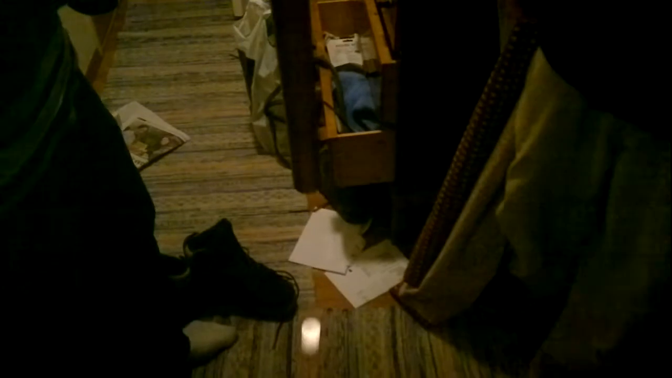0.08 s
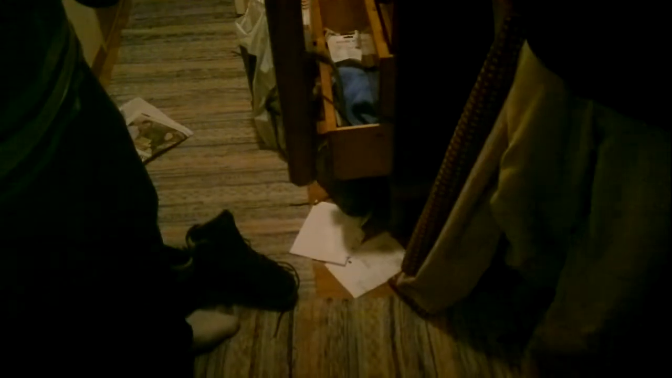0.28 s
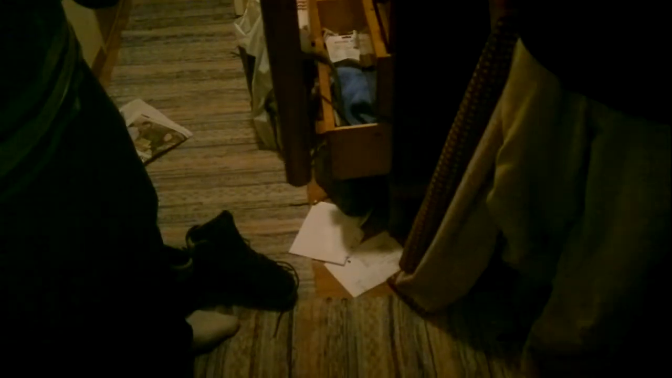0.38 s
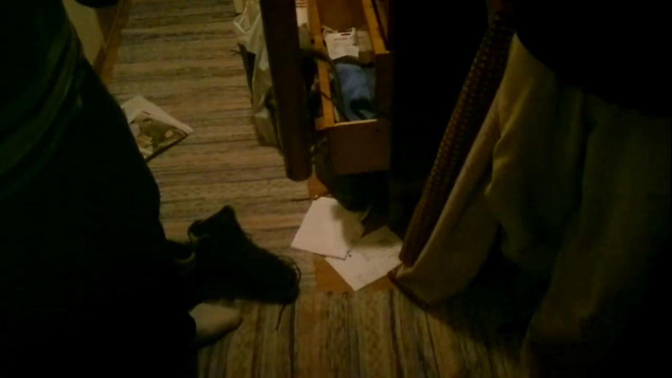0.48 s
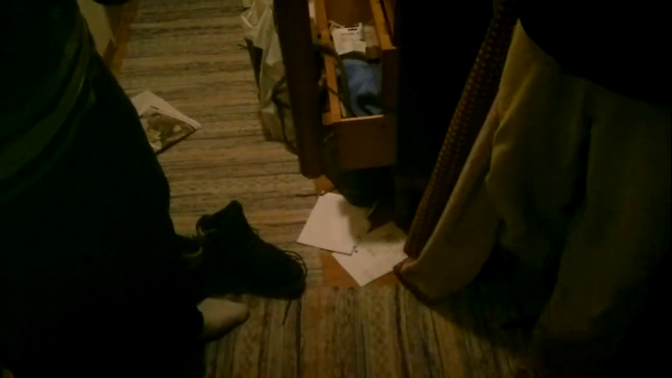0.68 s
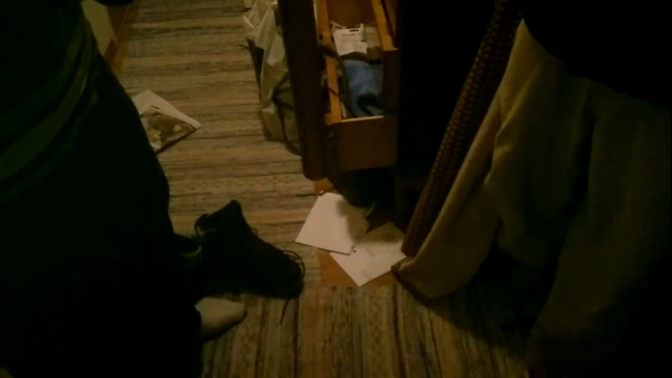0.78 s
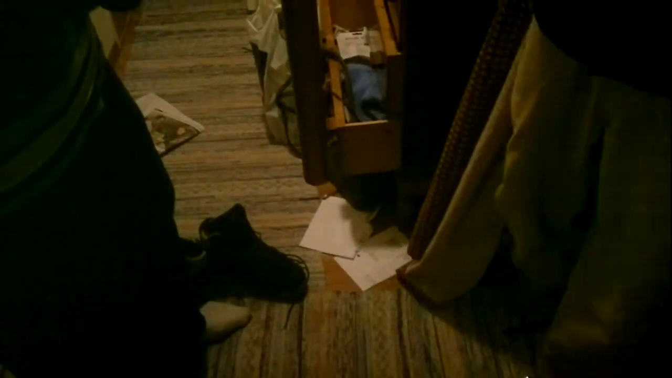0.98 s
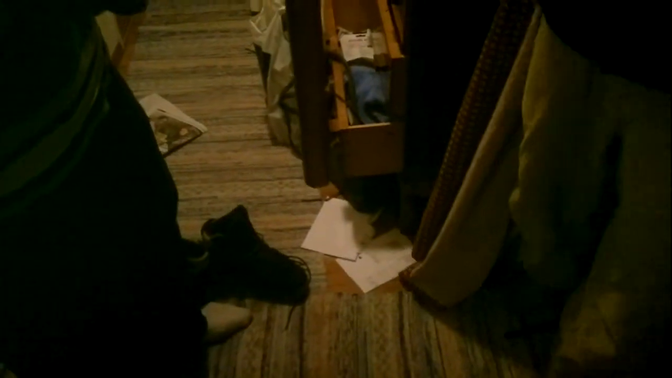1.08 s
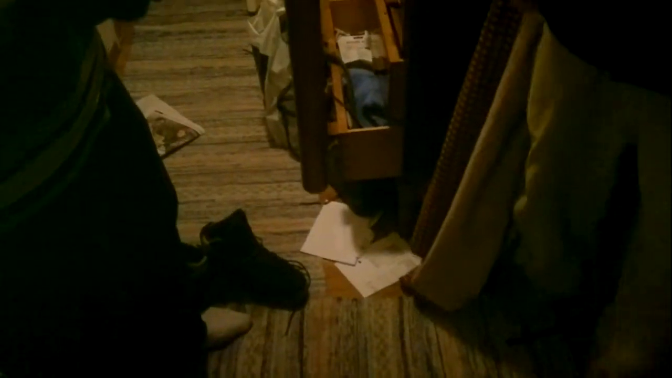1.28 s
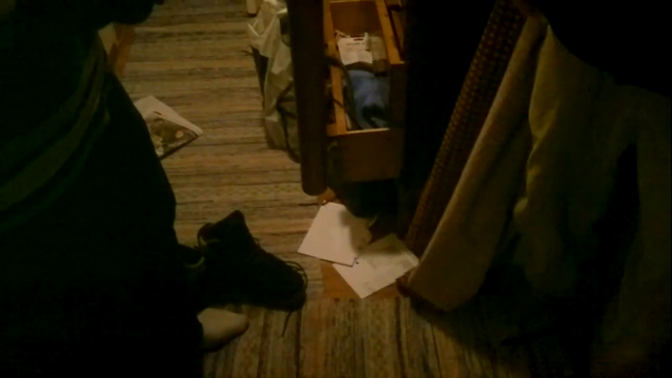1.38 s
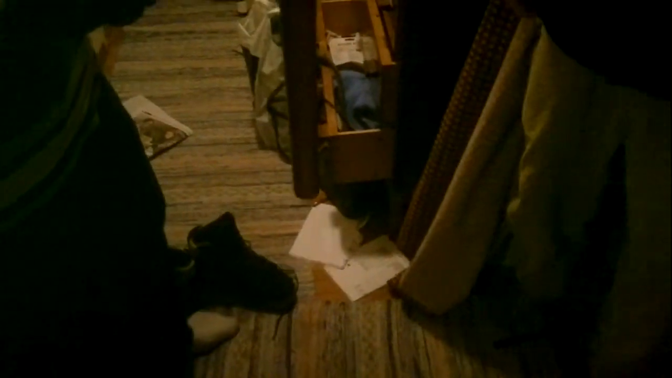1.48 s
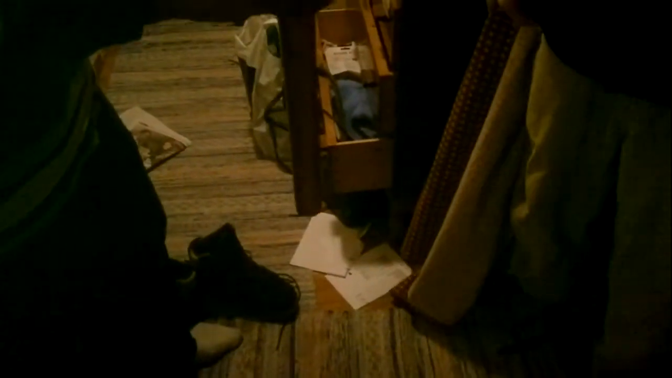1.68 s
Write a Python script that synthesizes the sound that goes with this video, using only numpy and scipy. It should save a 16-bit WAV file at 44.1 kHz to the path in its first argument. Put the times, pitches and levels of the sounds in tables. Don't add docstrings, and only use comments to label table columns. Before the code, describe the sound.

Hard knock of a small heavy magnet landing on floorboards, two duller bounces, then foot scuffs

```python
import sys
import numpy as np
from scipy import signal
from scipy.io import wavfile

SR = 44100
rng = np.random.default_rng(int(sys.argv[2]) if len(sys.argv) > 2 else 0)


def elevation(decibels):
    levels = np.asarray(decibels, float)
    return 10 ** (levels / 20)


def output_pcm(signal):
    pcm = np.clip(np.atleast_2d(signal).T, -1, 1) * 32767
    wavfile.write(sys.argv[1], SR, np.round(pcm).astype(np.int16))


N = 74970

SIDES = np.array([[1.], [-1.]])

# (frequency [Hz], density [dB/Hz])
TONE = [(22, -5), (42, -2), (110, -14.5), (300, -17.5), (800, -22), (1500, -32), (4000, -39), (16000, -56)]
TONE_DB = -58
# (frequency [Hz], correlation [-1..1])
TONE_LIKENESS = [(60, 0.81), (240, 0.74), (950, 0.71), (3770, -0.61), (15000, -0.03)]
# (time [s], level [dB])
DUCT = [(0, -72), (.18, -61), (.6, -71), (.75, -58), (.81, -59), (.84, -76), (1.0, -58), (1.45, -68),
        (1.7, -72)]
DUCT_HZ, DUCT_WIDTH_HZ = 1000, 420

# (time [s], level [dB])
SHUFFLE = [(.84, -78), (.865, -64.5), (.91, -51.5), (.94, -67.5), (.97, -45.5), (1.02, -62), (1.17, -65),
           (1.21, -59.5), (1.3, -73), (1.5, -69.5), (1.58, -60), (1.63, -77), (1.7, -71)]
# (frequency [Hz], density [dB/Hz])
SOLE = [(88, -14.5), (150, -3.5), (416, -4), (1160, -1.5), (1600, -5), (1840, -9.5), (2860, -20),
        (4810, -25.5), (15000, -57)]
# (frequency [Hz], correlation [-1..1])
SOLE_LIKENESS = [(200, 1), (1000, 0.17), (3000, 0.11)]
SOLE_DB, GRAINS_PER_S, GRAIN_SHARE = 4, 3500, 0.5
# (time [s], level [dB])
DRAG = [(.96, -88), (.98, -51.5), (1.05, -58.5), (1.12, -49.5), (1.15, -48), (1.19, -61), (1.25, -70)]
DRAG_LOW_HZ, DRAG_HIGH_HZ = 225, 600
# (time [s], length [s], level [dB], low edge [Hz], high edge [Hz])
SCUFFS = [(0.2059, 0.021, -30.5, 1200, 2990), (0.436, 0.073, -54.5, 1400, 2500),
          (0.573, 0.062, -66, 1360, 2440), (0.848, 0.23, -62, 1800, 2210), (0.89, 0.2, -55.5, 1510, 2500),
          (0.993, 1, -74, 3520, 10600), (1.558, 0.068, -53, 600, 2680), (0.891, 0.016, -63.5, 2500, 7930),
          (0.949, .01, -60, 1960, 6940), (0.98, 0.046, -54, 505, 4440), (1.186, 0.052, -60.5, 600, 4370),
          (0.226, 0.05, -44.5, 2800, 4260), (0.226, 0.032, -55, 4800, 7500),
          (0.223, 0.048, -27.5, 1000, 2000), (1.555, 0.015, -55.5, 2970, 11600),
          (1.564, 0.036, -53, 1800, 5230)]
# (time [s], peak level [dB], frequency [Hz], left-right level [dB], T60 [s])
TICKS = [(0.8938, -55, 3700, 21, 0.0091), (.952, -37.5, 1000, 9, 0.0037), (0.967, -30.5, 700, -3, 0.014),
         (.9635, -51, 3360, 9, 0.006), (0.9751, -34, 516, 8, 0.016), (0.981, -46, 1160, 8, 0.008),
         (0.9885, -40, 910, -5, 0.011), (0.9676, -26, 2320, 0.5, 0.0084), (0.9676, -45.5, 4100, 22, 0.011),
         (0.972, -33, 770, 3, 0.0093), (1.1012, -58, 2290, 7, 0.031), (1.401, -43.5, 980, 1, 0.0081),
         (1.474, -42, 837, 6.5, 0.014), (1.4983, -38.5, 1200, -6, 0.0038), (1.497, -51, 2300, -15, 0.004),
         (1.5355, -52, 2700, -4, 0.0035), (1.546, -54, 4000, -3.3, 0.005), (1.5554, -40, 4550, 8, 0.003),
         (1.5565, -41, 2280, -3, 0.005), (1.5625, -50, 3020, -2, 0.0046), (1.5645, -49, 960, -7, .01),
         (1.5705, -48, 5000, -2, 0.006), (1.5696, -46, 600, 8, .01), (1.5562, -63, 9310, 11, 0.0071),
         (1.559, -39.5, 780, -3, 0.032), (1.568, -41.5, 3700, -11, 0.01), (1.658, -46.5, 1040, -1, 0.026)]
TICK_SCRATCH_S, TICK_ROOM_DB = 0.0014, -43.5

# (frequency [Hz], density [dB/Hz])
ROOM = [(40, -12.5), (135, -6), (300, -1.5), (700, -12), (1500, -22.5), (3600, -32.5), (5500, -43),
        (8500, -76)]
# (frequency [Hz], T60 [s])
ROOM_T60 = [(60, 0.51), (160, 0.25), (420, 0.36), (1100, 0.34), (2500, 0.3), (4500, 0.38), (7500, 0.2)]
# (frequency [Hz], correlation [-1..1])
LIKENESS = [(60, 0.071), (180, 0.28), (550, 0.92), (1650, 0), (4970, 0.64), (15000, 0)]
ROOM_DB, ROOM_RISE_S = -31, 0.0072
ROOM_SAG_DB, ROOM_SAG_HZ = 1100.5, 2780

# (time [s], level [dB], contact cutoff [Hz], room send [dB], left-right level [dB])
STRIKE = [
    (0.2062, -9.5, 4650, -2, -2),
]
BOUNCES = [
    (0.4305, -19.5, 1070, -15, -2.5),
    (0.5665, -32.5, 1170, -8, -2),
]
STEP = [
    (1.186, -25.5, 2500, -17, -5),
]
# (frequency [Hz], level [dB], T60 [s], delay [s])
BOARDS_STRIKE = [(64.6, -22, 0.31, 0.015), (208.3, -9, 0.1, 0.017), (271.1, 2, 0.17, 0.01523),
                 (313.8, 0.5, 0.2, 0.00796), (344, 2, 0.15, 0.00339), (425, -9.5, 0.035, 0.006),
                 (548.2, 0.5, .15, .001), (631.5, -1, 0.09, .017), (921, -5.5, 0.066, 0.0011),
                 (1111, -10, 0.1, 0.004), (1305, -10, 0.056, 0.0012), (584, -10.5, 0.26, 0.04),
                 (2500, -16.5, 0.036, .0005), (915, -9.5, .06, .02)]
BOARDS_BOUNCE = [(61.2, -31.5, 0.416, 0.021), (157.6, 0.5, 0.09, 0.0031), (190.4, 4, 0.025, 0.02113),
                 (269.8, -8, 0.22, 0.0082), (419.7, 5, 0.06, 0.0008), (329, 2.5, 0.03, 0.01048),
                 (603, -0.5, 0.028, 0.00012), (752, -8.5, 0.047, 0.00049), (1200, -30, 0.11, 0.0011),
                 (360, -10.5, 0.15, 0.052), (224, -20, .06, 0.039), (156.8, -11, 0.14, .081),
                 (498, -9, 0.14, 0.01), (3800, -44.5, .006, 0.006)]
BOARDS_LAST = [(60.5, -35, 0.3, 0.017), (155, 1, 0.088, 0.0047), (184, 0, 0.056, 0.022),
               (272, -2, 0.13, 0.00974), (420, 4.5, 0.047, 0.00072), (318, 1, 0.075, 0.012),
               (607, -1.5, 0.019, 0.00012), (762, -8.5, 0.032, 0.00057), (332, -6.5, 0.051, 0.054),
               (472, -12.5, 0.064, 0.05), (156, -19, 0.093, .08), (2920, -34, .008, 0.001)]
BOARDS_STEP = [(70.7, -11.5, 0.21, 0.0091), (104.3, -0.5, 0.065, 0.012), (127.3, -4, 0.081, 0.06),
               (265, -5.5, 0.014, 0.0124), (313, -14.5, 0.047, 0.02), (123, -15, 0.057, 0.08),
               (108, -24.5, 0.084, .142), (93, -11.5, 0.07, 0.09), (166, -9, 0.03, 0.0005),
               (530, -19.5, 0.11, 0.00049), (1000, -19, 0.015, 0.0018), (201, -9, 0.028, 0.037)]
# (frequency [Hz], difference [dB])
BOARD_PAN = [(60, -4.5), (130, -3), (290, -1.5), (640, 0.5), (1410, -1.5), (3100, -1.5), (6820, -3.0),
             (15000, -9.0)]
# (frequency [Hz], lead of the left [rad])
BOARD_LEAD = [(0, 0), (1210, -0.08), (2330, -4.5), (2930, -1.6), (3450, -5), (6370, 2), (8100, 0.0),
              (15700, 0.1)]
SWELL_CYCLES = 4.7

CLIP_TOP, CUTOFF_HZ, MIC_LOW_HZ = 0.95, 15900, 33


def rms_one(x):
    return x / np.sqrt(np.mean(x ** 2) + 1e-20)


def in_time(rows):
    s, db = np.transpose(rows)
    return elevation(np.interp(np.arange(N) / SR, s, db))


def at_hz(points, hz):
    x, y = np.transpose(points)
    return np.interp(np.log(hz), np.log(x), y)


def drift(rate_hz):
    r = np.exp(-2 * np.pi * rate_hz / SR)
    white = rng.standard_normal(N + SR)
    return rms_one(signal.lfilter([1], [1, -2 * r, r * r], white)[SR:])


def ring(x, hz, t60):
    r = elevation(-60 / (t60 * SR))
    w = 2 * np.pi * hz / SR
    return signal.lfilter([0, np.sin(w)], [1, -2 * r * np.cos(w), r * r], x + 1e-18)


def click(s, db):
    x = np.zeros(N)
    x[int(s * SR)] = elevation(db)
    return x


def burst(s, t60):
    t = np.arange(N) / SR - s
    decay = (t >= 0) * elevation(-60 * np.maximum(t, 0) / t60)
    return decay * (rng.standard_normal((2, N)) + 0.53 * rng.standard_normal(N))


def low_pass(x, order, hz):
    return signal.sosfilt(signal.butter(order, hz, fs=SR, output="sos"), x)


def band_pass(x, order, low_hz, high_hz):
    return signal.sosfilt(signal.butter(order, [low_hz, high_hz], "band", fs=SR, output="sos"), x)


def band(x, low_hz, high_hz):
    return band_pass(x, 3, low_hz, high_hz) * np.sqrt(SR / 2 / (high_hz - low_hz))


def bands(white, spectrum, likeness, gain, order=2):
    out = 0
    edges = 22 * 2 ** np.arange(0, 9.6, 0.5)
    for k, (low, high) in enumerate(zip(edges, edges[1:])):
        mid, side = band_pass(white[k % 2], order, low, high)
        hz = np.sqrt(low * high)
        alike = at_hz(likeness, hz)
        stereo = np.sqrt(1 + alike) * mid + np.sqrt(1 - alike) * side * SIDES
        out = out + elevation(at_hz(spectrum, hz)) * gain(hz) * stereo
    return out


def room_tone():
    def sway(hz):
        return elevation(np.interp(hz, [300, 2000], [2.5, 0.4]) * drift(8))

    white = rng.standard_normal((2, 2, N))
    return elevation(TONE_DB) * rms_one(bands(white, TONE, TONE_LIKENESS, sway))


def duct():
    white = rng.standard_normal((2, N)) + 2.4 * rng.standard_normal(N)
    hiss = band_pass(white, 3, DUCT_HZ - DUCT_WIDTH_HZ / 2, DUCT_HZ + DUCT_WIDTH_HZ / 2)
    return in_time(DUCT) * rms_one(hiss)


def shuffle():
    shape = (2, 2, N)
    slips = rng.random(shape) < GRAINS_PER_S / SR
    heights = elevation(np.minimum(rng.exponential(1, shape), 4))
    grains = slips * heights * rng.choice([-1, 1], shape)
    white = GRAIN_SHARE * rms_one(grains) + (1 - GRAIN_SHARE) * rng.standard_normal(shape)
    rub = rms_one(bands(white, SOLE, SOLE_LIKENESS, lambda hz: elevation(2.7 * drift(28.7))))
    silent_start = (SHUFFLE[0][0] - 0.03, -100)
    return rub * elevation(SOLE_DB) * in_time([silent_start] + list(SHUFFLE))


def heel_drag():
    white = 0.5 * rng.standard_normal((2, N)) + rng.standard_normal(N)
    return in_time(DRAG) * elevation(2 * drift(18.6)) * band(white, DRAG_LOW_HZ, DRAG_HIGH_HZ)


def scuffs():
    out = 0
    for s, length, db, low_hz, high_hz in SCUFFS:
        out = out + elevation(db) * band(burst(s, 2 * length), low_hz, high_hz)
    return out


def ticks(room):
    dry = 0
    for s, db, hz, pan_db, t60 in TICKS:
        scratch = low_pass(burst(s, TICK_SCRATCH_S), 2, min(2 * hz, 18000))
        tick = ring(scratch, hz, t60)
        dry = dry + elevation(db + pan_db / 2 * SIDES) * tick / np.abs(tick).max()
    bright_room = np.diff(room, n=2, axis=1) * 10
    return dry + elevation(TICK_ROOM_DB) * signal.fftconvolve(dry, bright_room, axes=1)[:, :N]


def room_answer():
    t = np.arange(SR // 2) / SR

    def swell_and_decay(hz):
        sag_db = ROOM_SAG_DB * (hz / ROOM_SAG_HZ) ** 2 * t ** 2
        return (1 - np.exp(-t / ROOM_RISE_S)) ** 2 * elevation(-60 * t / at_hz(ROOM_T60, hz) - sag_db)

    white = rng.standard_normal((2, 2, len(t)))
    tail = bands(white, ROOM, LIKENESS, swell_and_decay, order=4)
    return tail / np.sqrt(np.mean(tail[:, :SR // 20] ** 2))


def floor_blows(blows, modes, room):
    out = np.zeros((2, N))
    for s, db, cut_hz, send_db, pan_db in blows:
        boards = 0
        for hz, level_db, t60, late in modes:
            force = ring(click(s + late, 0), hz, SWELL_CYCLES / hz)
            mode = ring(force, hz, t60)
            lag = int(round(at_hz(BOARD_LEAD, hz) / (2 * np.pi * hz) * SR))
            stereo = np.array([mode, np.roll(mode, lag)]) / np.abs(mode).max()
            boards = boards + elevation(db + level_db + at_hz(BOARD_PAN, hz) / 2 * SIDES) * stereo
        push = low_pass(click(s, db + send_db) + 1e-18, 4, cut_hz)
        answer = signal.fftconvolve(push[None], room, axes=1)[:, :N]
        out += elevation(pan_db / 2 * SIDES) * (boards + answer)
    return out


def scene():
    room = room_answer()
    blow_room = elevation(ROOM_DB) * room * 20
    magnet = floor_blows(STRIKE, BOARDS_STRIKE, blow_room)
    magnet += floor_blows(BOUNCES[:1], BOARDS_BOUNCE, blow_room)
    magnet += floor_blows(BOUNCES[1:], BOARDS_LAST, blow_room)
    step = floor_blows(STEP, BOARDS_STEP, blow_room)
    shoe = shuffle() + heel_drag() + ticks(room) + step
    return room_tone() + duct() + shoe + scuffs() + magnet


def top_cut(x):
    return signal.sosfilt(signal.butter(12, 16130, fs=SR, output="sos"), x)


def record(dry):
    x = CLIP_TOP * np.tanh(dry / CLIP_TOP)
    x = signal.sosfilt(signal.cheby2(12, 70, CUTOFF_HZ * 1.05, fs=SR, output="sos"), x)
    x = signal.sosfilt(signal.butter(2, MIC_LOW_HZ, "high", fs=SR, output="sos"), x)
    return top_cut(x)


dry = scene()
out = record(dry)
output_pcm(out)
```